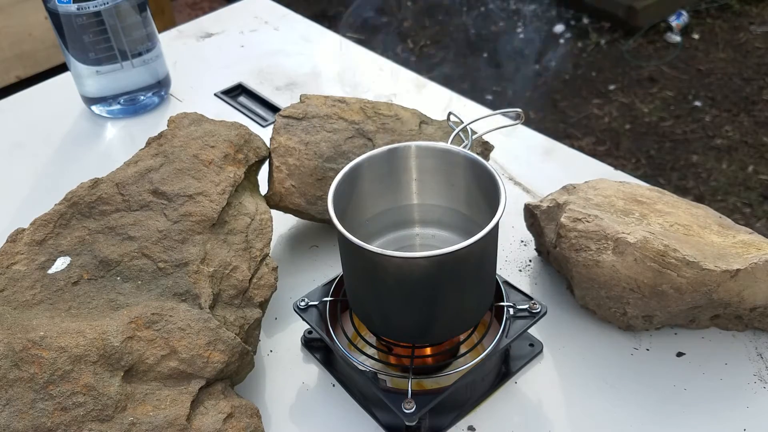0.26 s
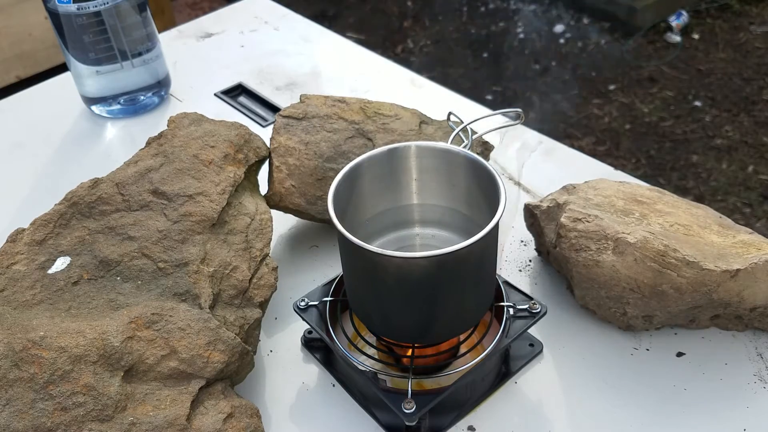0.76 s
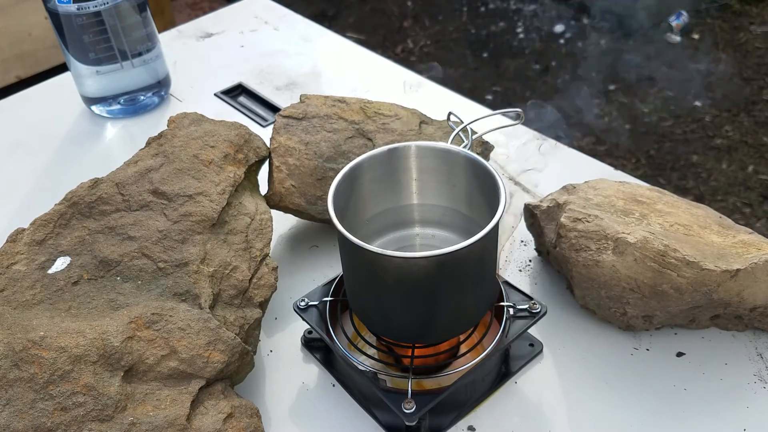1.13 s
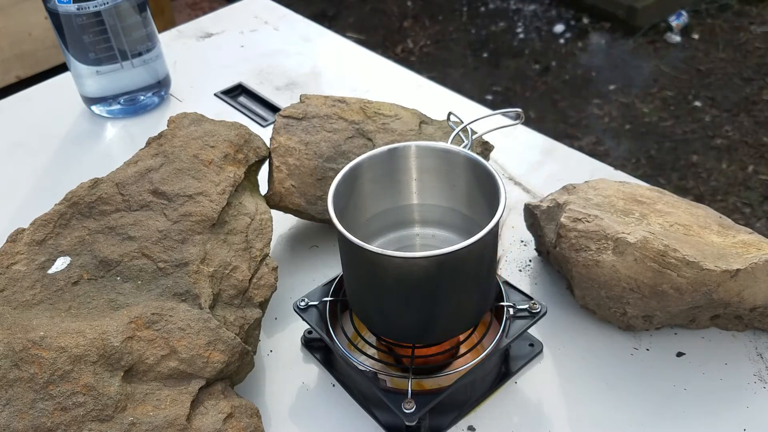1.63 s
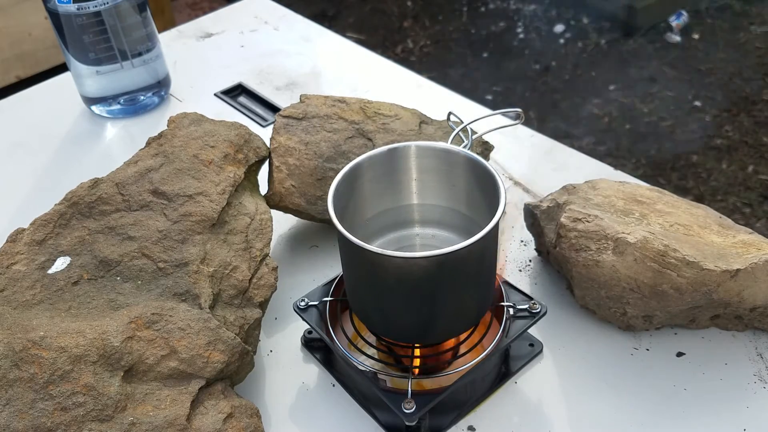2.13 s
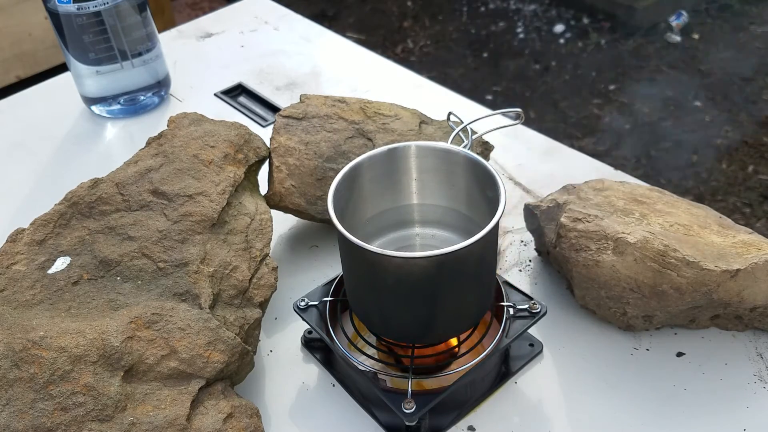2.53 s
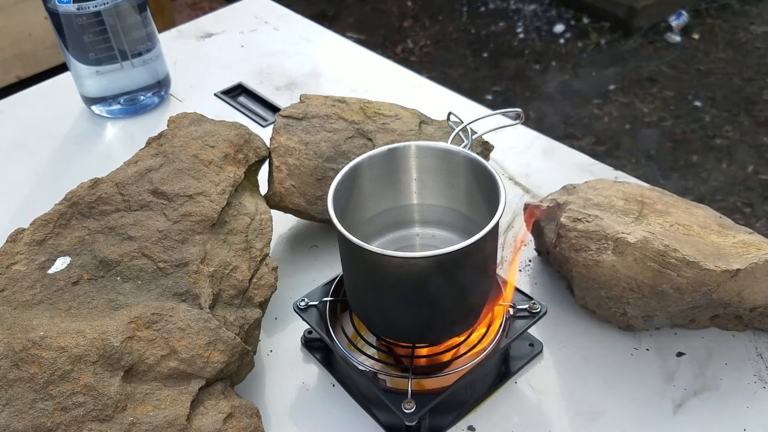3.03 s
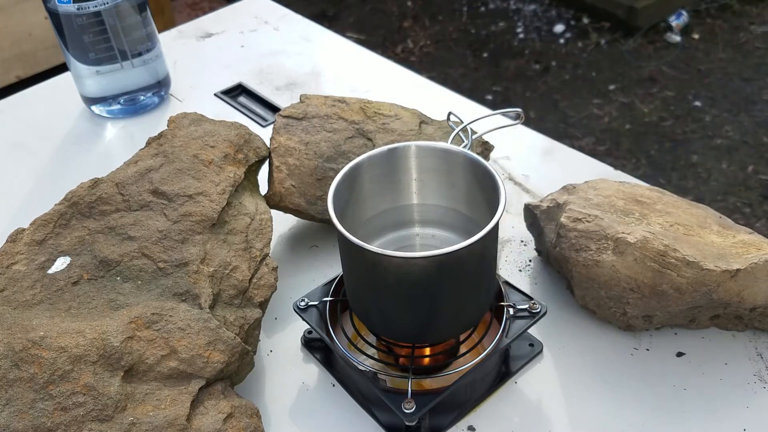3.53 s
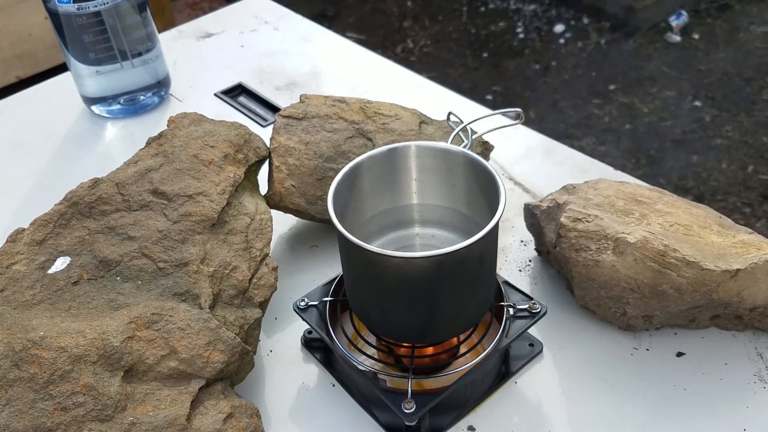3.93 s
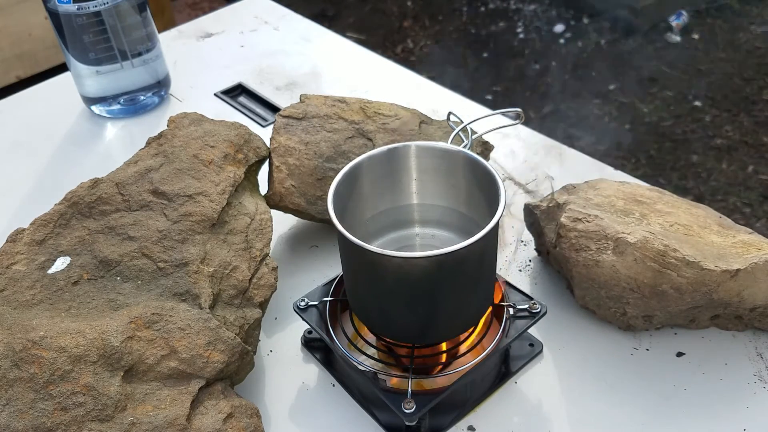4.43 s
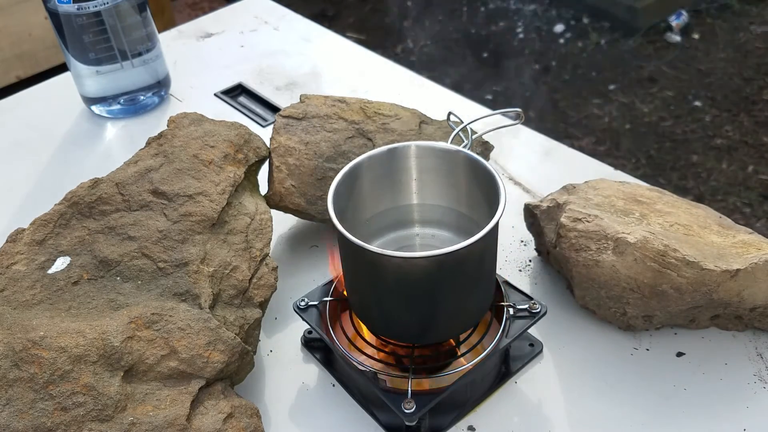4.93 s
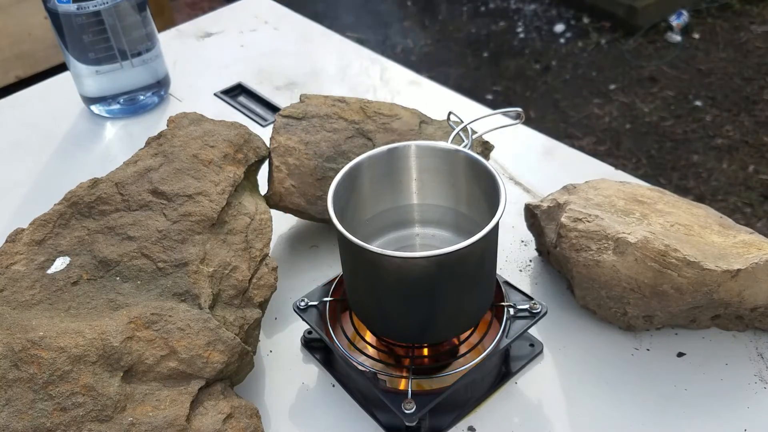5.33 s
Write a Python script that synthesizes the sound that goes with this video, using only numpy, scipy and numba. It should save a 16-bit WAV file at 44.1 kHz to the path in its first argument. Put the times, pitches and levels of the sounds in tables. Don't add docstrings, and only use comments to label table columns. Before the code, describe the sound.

Outdoor stereo recording, loudest barks pressing the recorder's limit. A large dog gives a rapid run of throaty barks in twos, falls silent for over two seconds, then barks twice again. Each rings briefly off surrounding fences. Close by, crisp dry leaves tick and rustle irregularly; behind are a low steady traffic hum, a faint cricket and light puffs of wind.

```python
import sys
import numpy as np
from scipy import signal
from scipy.io import wavfile
from scipy.ndimage import uniform_filter1d, minimum_filter1d
from numba import njit

SR = 44100
rng = np.random.default_rng(int(sys.argv[2]) if len(sys.argv) > 2 else 0)


def ratio_of_db(decibels):
    return 10 ** (np.asarray(decibels, float) / 20)


def digitize_waveform(pressure):
    field = np.atleast_2d(pressure).T
    bounded = np.clip(field, -1, 1)
    quanta = np.round(bounded * 32767).astype(np.int16)
    wavfile.write(sys.argv[1], SR, quanta)


N = 245809

# start t/s, length/s, first pitch f/Hz, last pitch f/Hz, level/dB
CLEAN_STRETCHES = [(.168, .012, 358, 390, -13), (.192, .038, 428, 437, -6.5), (.612, .008, 425, 428, -21),
                   (.625, .018, 430, 434, -16), (.648, .023, 437, 438, -11), (.68, .03, 436, 435, -10.5),
                   (2.406, .016, 420, 490, -17), (2.441, .016, 419, 447, -4), (2.459, .021, 446, 430, -3.5),
                   (5.24, .016, 420, 495, -12.5), (5.268, .005, 446, 446, -5),
                   (5.282, .011, 436, 438, -4.5), (5.51, .004, 356, 358, -12), (5.52, .015, 364, 411, -5),
                   (5.537, .023, 416, 455, -4.5), (5.565, .004, 470, 480, -11)]
# throat opens t/s, level/dB, swell length/s, level after swell/dB, fall/(dB/s)
HOARSE_BARKS = [(-.06, -18.5, 0.12, -26, 66), (0.17, -22.5, 0.084, -17.5, 117), (0.634, -24, .06, -22, 41),
                (1.152, -22, 0.068, -15.5, 106), (1.606, -23, 0.053, -18, 87),
                (2.421, -23.5, 0.098, -16.5, 117), (2.804, -23, .05, -15.5, 96.5),
                (5.251, -22, 0.088, -21, 121), (5.519, -28, 0.049, -27, 112)]


def rms_one(x):
    return x / np.sqrt(np.mean(x ** 2) + 1e-20)


def band(x, edges_hz, kind="band", order=2):
    return signal.sosfilt(signal.butter(order, edges_hz, kind, fs=SR, output="sos"), x)


def in_time(tables, fade_s=0.01):
    t = np.arange(N) / SR
    rows = np.concatenate(tables)
    gate = sum(np.clip(np.minimum(t - r[0][0], r[-1][0] - t) / fade_s + 1, 0, 1) for r in tables)
    return np.minimum(gate, 1), [np.interp(t, rows[:, 0], column) for column in rows.T[1:]]


def at_hz(points, hz):
    table_hz, value = np.transpose(points)
    return np.interp(np.log(hz), np.log(table_hz), value)


def drift(rate_hz):
    r = np.exp(-80 * np.pi * rate_hz / SR)
    slow = signal.lfilter([1], [1, -2 * r, r * r], rng.standard_normal(N // 40 + 2002))[2000:]
    return np.interp(np.arange(N) / 40, np.arange(len(slow)), rms_one(slow))


@njit
def moving_peak(x, hz, width_hz, sr):
    y = np.zeros(len(x))
    for i in range(2, len(x)):
        r = np.exp(-np.pi * width_hz[i] / sr)
        drive = (1 - r * r) / 2 * (x[i] - x[i - 2])
        y[i] = drive + 2 * r * np.cos(2 * np.pi * hz[i] / sr) * y[i - 1] - r * r * y[i - 2]
    return y


def peak(x, hz, width_hz):
    hz, width_hz = hz + np.zeros(N), width_hz + np.zeros(N)
    return rms_one(moving_peak(moving_peak(x, hz, width_hz, SR), hz, width_hz, SR))


def evened(x):
    power = uniform_filter1d(x ** 2, size=SR // 30)
    return rms_one(x / (power + .02) ** .35)


def effort_db(rows):
    t = np.arange(N) / SR
    return np.max([np.interp(t, [s - 1, s, end, end + 1], [db - rise, db, end_db, end_db - fall],
                             left=-300, right=-300)
                   for s, db, end, end_db, rise, fall in rows], axis=0)


def traffic(patchy_db):
    # f/Hz, density/(dB per Hz)
    spectrum = [(25, -23), (60, -8.5), (130, -2.5), (250, 5), (400, -0.5), (700, 5.5), (1200, -3.5),
                (1700, -16), (2100, -20), (3000, -24.5), (4500, -32), (8000, -31.5), (12000, -40.5),
                (15500, -47)]
    # f/Hz, left-right likeness/1
    likeness = [(60, 0.59), (130, 0.94), (250, 0.99), (700, .99), (1700, 0.96), (3000, 0.77), (5000, 0.7),
                (12000, 0.62)]
    level_db = -38.5
    out, edges_hz = 0, 22 * 2 ** np.arange(0, 9.6, .5)
    white = rng.standard_normal((2, 2, N))
    for k, (low, high) in enumerate(zip(edges_hz, edges_hz[1:])):
        mid, side = band(white[k % 2], [low, high])
        hz = np.sqrt(low * high)
        alike = np.clip(at_hz(likeness, hz), 0, 1)
        gain = ratio_of_db(at_hz(spectrum, hz) + patchy_db * drift(3))
        out = out + gain * (np.sqrt(1 + alike) * mid + np.sqrt(1 - alike) * side * [[1], [-1]])
    return ratio_of_db(level_db) * rms_one(out)


def insects():
    # f/Hz, width/Hz, level/dB
    notes = [(2270, 15, -72), (2380, 18, -69), (11020, 150, -79.5)]
    cricket_hz, cricket_db, chirps_per_s = 5562, -71, 13
    t = np.arange(N) / SR
    chirps = np.clip(2 * (.3 + np.sin(2 * np.pi * chirps_per_s * (t - .058))), 0, 1)
    out = ratio_of_db(cricket_db + 2.5 * drift(2.5)) * chirps * np.sin(2 * np.pi * cricket_hz * t)
    for hz, width_hz, db in notes:
        out += ratio_of_db(db + 2.4 * drift(4.2)) * peak(rng.standard_normal(N), hz, width_hz)
    return out


def wind():
    # t/s, level/dB
    puffs = [(1.7, -64), (2.68, -45), (3.0, -50), (3.45, -45), (4.43, -43.5), (4.63, -43.5), (5.0, -48)]
    t = np.arange(N) / SR
    lumps = sum(ratio_of_db(db) * np.exp(-((t - s) / 0.04) ** 2) for s, db in puffs)
    mid, side = band(rng.standard_normal((2, N)), [50, 130])
    return lumps * rms_one(np.array([mid + 1.1 * side, mid - 0.66 * side]))


def scrape():
    # t/s, centre f/Hz, level/dB
    slides = [
        [(.77, 3600, -61), (.83, 3880, -55.5), (.9, 3700, -52), (.97, 3500, -63), (1.1, 3460, -59)],
    ]
    gate, (hz, level_db) = in_time(slides, fade_s=0.024)
    return gate * ratio_of_db(level_db + 1.4 * drift(30)) * peak(rng.standard_normal(N), hz, 500)


def rustle():
    clumps = [(0.101, -43.5, 25, 59, 4460), (.488, -47.5, 683, 124, 5100), (1.17, -57.5, 499, 41, 6970),
              (1.82, -57, 500, 22.5, 5980), (1.917, -44.5, 116, 232, 5500), (2.128, -51, 154, 279, 5460),
              (2.29, -54.5, 800, 328, 5310), (2.42, -47.5, 500, 299.5, 4220),
              (2.51, -49.5, 206, 155.5, 6180), (2.7, -55.5, 76.5, 143, 6050), (2.86, -54, 395, 36, 4600),
              (3.008, -38, 297.5, 282, 5700), (3.085, -47.5, 900, 500, 6060), (3.51, -58.5, 500, 15, 6200),
              (3.62, -49, 120, 99, 5940), (3.8, -54.5, 148, 230, 5400), (4.039, -62, 500, 28.5, 6420),
              (4.16, -55, 40, 392, 6280), (4.221, -50, 695, 550, 5860), (4.425, -52, 600, 203, 6160)]
    grains_per_s, hiss_db = 14000, -12
    level_db = effort_db([(s, db, s + 1 / SR, db, rise, fall) for s, db, rise, fall, _ in clumps])
    hz, = in_time([[(row[0], row[-1]) for row in clumps]])[1]
    born = rng.random((2, N)) < grains_per_s * ratio_of_db(3.5 * drift(40)) / SR
    size = ratio_of_db(2.8 * rng.exponential(1, (2, N)))
    mid, side = born * size * rng.choice([-1, 1], (2, N))
    grains = np.array([mid + 0.2 * side, mid - 0.21 * side])
    hump = np.array([peak(g, hz, 0.93 * hz) for g in grains])
    hiss = band(grains, [8000, 13000])
    return ratio_of_db(level_db) * (hump + ratio_of_db(hiss_db) * rms_one(hiss))


def ticks():
    # t/s, peak level/dB, centre f/Hz, body level/dB
    snaps = [(0.233, -30.5, 5320, -33), (0.4767, -25.5, 5230, -34.5), (0.577, -54, 3510, -40),
             (1.92, -26.5, 3500, -23.5), (1.94, -50, 6130, -37), (2.1, -40.5, 5500, -34.5),
             (2.1287, -34.5, 5550, -23), (2.1424, -45, 6440, -29.5), (2.287, -38, 5490, -57),
             (2.5096, -24.5, 6160, -26.5), (2.9883, -38, 6470, -25), (3.0037, -27, 5980, -28),
             (3.0275, -32.5, 6670, -33), (3.039, -35, 6470, -29), (3.0818, -30, 5420, -49.5),
             (3.5766, -33, 6460, -43.5), (3.6192, -26, 6330, -29), (3.634, -33.5, 4440, -34),
             (3.687, -39, 3720, -31), (3.801, -32, 6900, -51), (4.1151, -33.5, 6340, -38),
             (4.146, -26, 6530, -37), (4.23, -48.5, 5840, -62), (4.4226, -40.5, 6750, -37),
             (4.4628, -51.5, 7000, -43), (4.6483, -36.5, 8350, -62), (4.9263, -44, 5450, -37.5),
             (5.201, -61.5, 3610, -56)]
    rise_s, decay_s, pan_db = 0.00036, .0036, 0.5
    out, t = np.zeros((2, N)), np.arange(1200) / SR
    pan = ratio_of_db(np.array([[pan_db / 2], [-pan_db / 2]]))
    for s, db, hz, body_db in snaps:
        envelope = np.exp(-t / decay_s) * (1 - np.exp(-t / rise_s))
        snap = rng.standard_normal((2, 1200)) * envelope
        bright = band(snap[0], [.6 * hz, min(1.5 * hz, .45 * SR)])
        body = band(snap[1], [1300, 3300])
        both = ratio_of_db(db - 8.5) * bright / np.abs(bright).max() + ratio_of_db(body_db - 3.5) * body / np.abs(body).max()
        i = round(s * SR)
        out[:, i:i + 1200] += both * pan
    return out


def yard(x):
    fence_delays_s = [.07, .12, .225, .31]
    fence_db = [-24, -33, -27.5, -25]
    tail_db, t60_s, onset_s = -14, .7, 0.0067
    smear_s, side_gain, cut_hz = 0.019, .6, 5200
    t = np.arange(round(1.2 * SR)) / SR
    unit_energy = np.sqrt(2 * np.log(1000) / t60_s / SR)
    shape = ratio_of_db(tail_db - 60 * t / t60_s) * np.minimum(1, t / onset_s) * unit_energy
    for delay, db in zip(fence_delays_s, fence_db):
        shape = shape + ratio_of_db(db) * np.exp(-((t - delay) / smear_s) ** 2) / np.sqrt(smear_s * SR)
    mid, side = rng.standard_normal((2, len(t))) * shape
    side = side_gain * band(side, 900, "high")
    answer = band([mid + side, mid - side], cut_hz, "low")
    return signal.fftconvolve(x[None], answer, axes=1)[:, :N]


def grunt():
    hz, width_hz, level_db, lead_s, length_s = 250, 440, -9, 0.0099, 0.022
    t = np.arange(N) / SR
    push = sum(ratio_of_db(end_db + level_db) * np.exp(-((t - s + lead_s) / length_s) ** 2)
               for s, _, _, end_db, _ in HOARSE_BARKS)
    return push * evened(peak(rng.standard_normal(N), hz, width_hz))


def tone_db():
    rise_db_per_s, fall_db_per_s = 1797.5, 1802
    return effort_db([(s, db, s + length, db, rise_db_per_s, fall_db_per_s)
                      for s, length, _, _, db in CLEAN_STRETCHES])


def clean_voice():
    # multiple/1, level/dB
    overtones = [(2, -34), (3, -25), (5, -46), (7, -56)]
    # t/s, pitch f/Hz, level/dB, half length/s
    throbs = [(0.014, 409, -8, 0.0084), (0.057, 398, -19, 0.032), (0.253, 533, -15, 0.012),
              (0.28, 444, -8.5, 0.003), (1.184, 375, -19, 0.0034), (1.199, 374, -13, 0.012),
              (1.23, 388, -10, 0.0079), (1.262, 368, -16.5, 0.01), (1.617, 385, -12.5, 0.007),
              (1.63, 387, -17.5, 0.0014), (1.656, 430, -15, 0.0062), (1.69, 415, -17.5, .008),
              (2.534, 410, -9, 0.0047), (2.571, 417, -17, 0.0038), (2.835, 408, -14, 0.015),
              (2.866, 393, -11, 0.0046), (2.886, 393, -9, 0.0064), (5.305, 467, -1, 0.0028),
              (5.314, 446, -9.5, 0.0047), (5.341, 415, -5.5, 0.0067)]
    glides = []
    for s, length, first_hz, last_hz, _ in CLEAN_STRETCHES:
        glides += [(s, first_hz), (s + length, last_hz)]
    hz, = in_time([glides])[1]
    phase = 2 * np.pi * np.cumsum(hz) / SR
    wave = np.sin(phase) + sum(ratio_of_db(db + 0.93 * drift(67)) * np.sin(k * phase) for k, db in overtones)
    out, t = np.sqrt(2) * ratio_of_db(tone_db()) * wave, np.arange(N) / SR
    for s, throb_hz, db, half_s in throbs:
        swell = np.exp(-((t - s) / half_s) ** 2)
        out += np.sqrt(2) * ratio_of_db(db) * swell * np.sin(2 * np.pi * throb_hz * (t - s))
    return out


def bark_db():
    lengths_s = [.21, .18, .17, .24, .24, .22, .26, .16, .2]
    rise_db_per_s, shut_db_per_s = 889.5, 496.5
    t, levels = np.arange(N) / SR, []
    for (s, db, swell, end_db, fall), length in zip(HOARSE_BARKS, lengths_s):
        effort = effort_db([(s, db, s + swell, end_db, rise_db_per_s, fall)])
        levels.append(effort - shut_db_per_s * np.maximum(0, t - s - length))
    return np.max(levels, axis=0)


def hoarse_voice():
    # high mouth f/Hz, top f/Hz, then chest, high mouth, top level/dB above the low mouth band
    mouth_shapes = [(1120, 1776, 4.5, 0, -8.5), (1200, 1950, -1, -6, -16), (1060, 1700, 2.5, -5.5, -8),
                    (1088, 1760, -5, 1.5, -11), (1125, 1670, -1, -3, -14), (1250, 1984, 4, -6, -8),
                    (1155, 1744, -3.1, -1, -12), (1215, 1936, 10, -8.5, -12), (1400, 1823, 4, -5.5, -10.5)]
    # f/Hz, width/Hz, level/dB
    side_resonances = [(234, 624, -11), (580, 320, -5), (905, 100, -12.5), (1572, 260, -13),
                       (2143, 150, -34)]
    # f/Hz, width/Hz, level/dB above the mouth band
    teeth = [(2500, 660, -25), (5160, 2000, -32), (8500, 1800, -43.5)]
    pulse_hz, jitter, breathy, rasp_db = 380.4, .3, 0.7, -5
    chest_hz, chest_width_hz, low_hz, mouth_width_hz = 415, 123, 715, 146
    top_width_hz, lip_cut_hz = 247, 2197
    shapes = [(bark[0] + bark[2], *shape) for bark, shape in zip(HOARSE_BARKS, mouth_shapes)]
    high_hz, top_hz, chest_db, high_db, top_db = in_time([shapes])[1]

    cycles = np.cumsum(pulse_hz * np.exp(jitter * drift(120))) / SR
    pulses = np.diff(np.floor(cycles), prepend=0) * ratio_of_db(0.64 * drift(76))
    air = rng.standard_normal(N) * (1 + np.cos(2 * np.pi * cycles)) * ratio_of_db(1.2 * drift(45))
    folds = rms_one(pulses) + breathy * rms_one(air)

    sway = 1 + 0.028 * drift(14.7)
    chest = evened(peak(folds, chest_hz * sway, chest_width_hz))
    chest = chest * (1 - .85 * np.minimum(1, ratio_of_db(tone_db() + 26)))
    mouth = peak(folds, low_hz * sway, mouth_width_hz)
    mouth = mouth - ratio_of_db(high_db) * peak(folds, high_hz * sway, mouth_width_hz)
    mouth = evened(mouth + sum(ratio_of_db(db) * peak(air, hz, width) for hz, width, db in side_resonances))
    top = ratio_of_db(top_db) * peak(folds, top_hz, top_width_hz)
    voiced = band(ratio_of_db(np.minimum(chest_db, 9)) * chest + mouth + top, lip_cut_hz, "low", order=6)
    rasp = ratio_of_db(rasp_db) * sum(ratio_of_db(db) * peak(air, hz, width) for hz, width, db in teeth)
    return ratio_of_db(bark_db()) * (voiced + rasp)


def scene():
    background = traffic(patchy_db=1.0) + insects()
    near = wind() + scrape() + rustle() + ticks()
    dog = hoarse_voice() + clean_voice()
    pan = ratio_of_db(np.array([[.12], [-.12]]))
    return background + near + yard(dog) + grunt() + dog * pan


def low_pass(x):
    return signal.sosfilt(signal.butter(12, 15830, fs=SR, output="sos"), x)


def record(dry):
    lopsided, ceiling, hold_s = 0.082, .94, .006
    x = band(dry + lopsided * dry ** 2, 25, "high", order=1)
    hold = round(hold_s * SR)
    gain = np.minimum(1, ceiling / (np.abs(x).max(axis=0) + 1e-9))
    gain = uniform_filter1d(minimum_filter1d(gain, size=hold), size=hold // 2)
    return low_pass(x * gain)


dry = scene()
out = record(dry)
digitize_waveform(out)
```